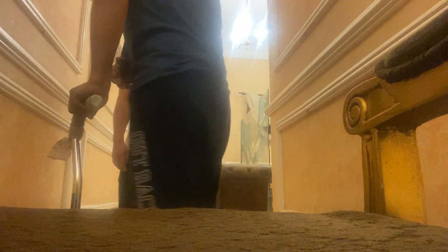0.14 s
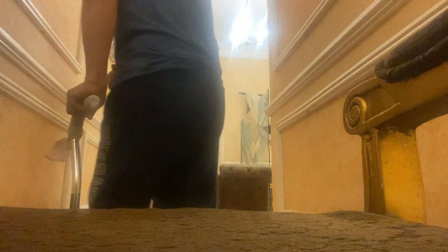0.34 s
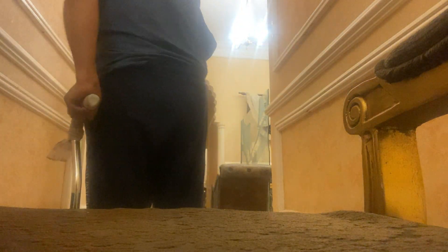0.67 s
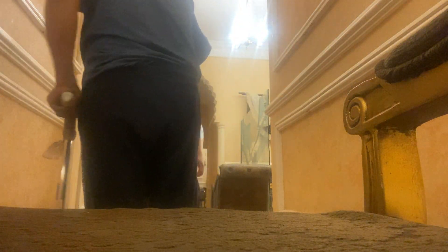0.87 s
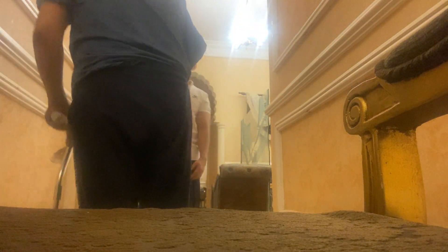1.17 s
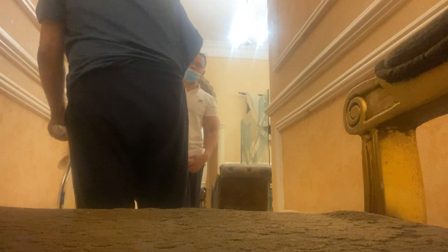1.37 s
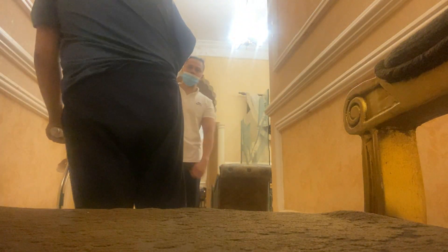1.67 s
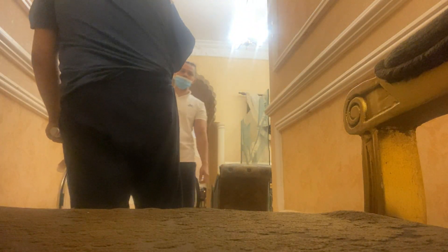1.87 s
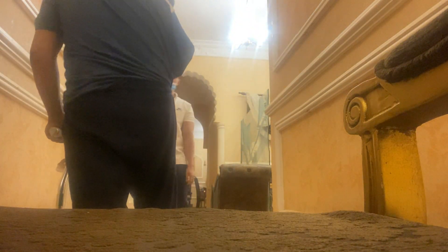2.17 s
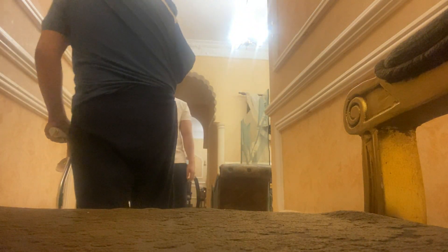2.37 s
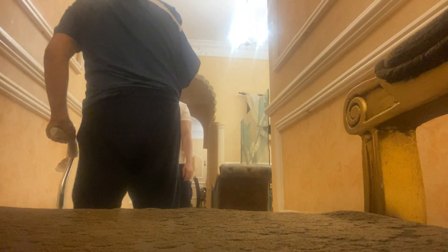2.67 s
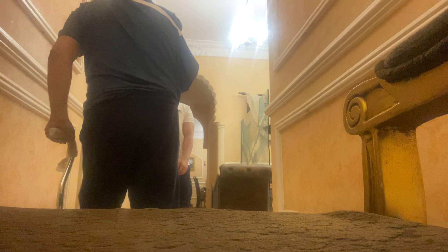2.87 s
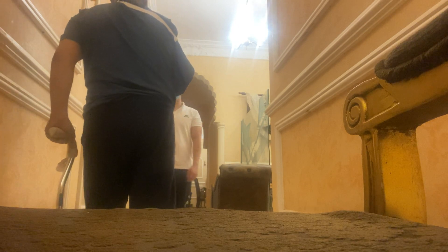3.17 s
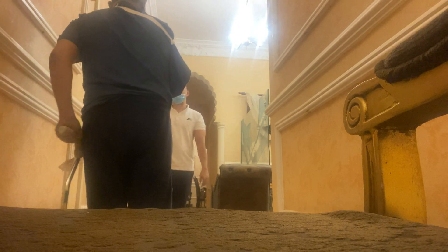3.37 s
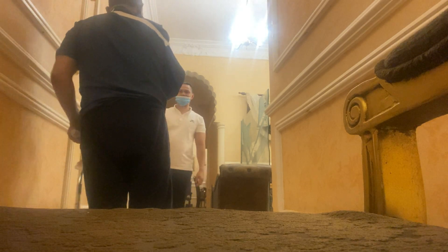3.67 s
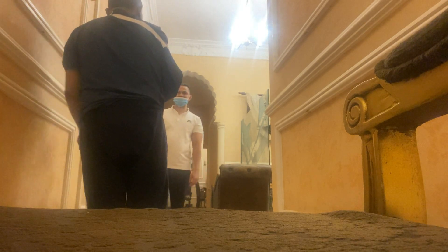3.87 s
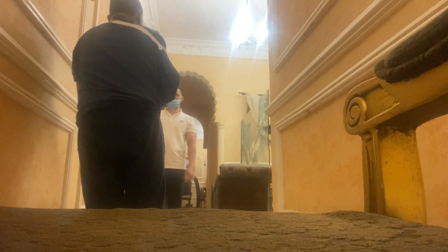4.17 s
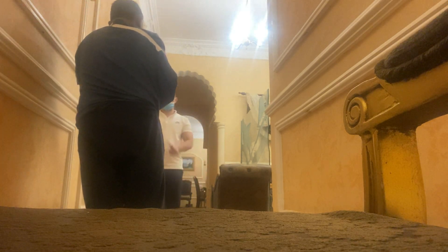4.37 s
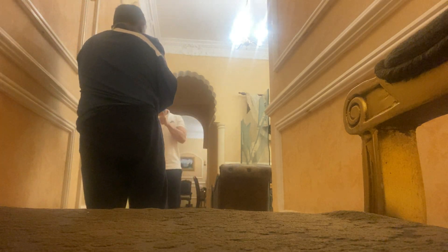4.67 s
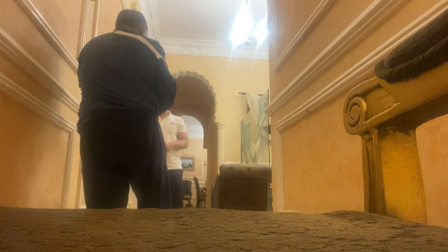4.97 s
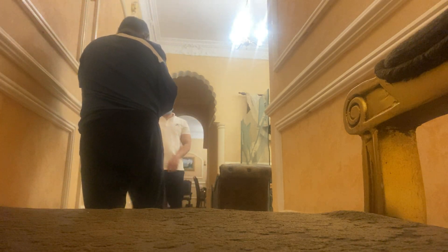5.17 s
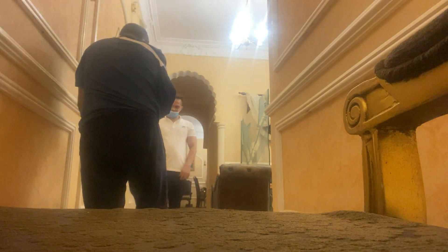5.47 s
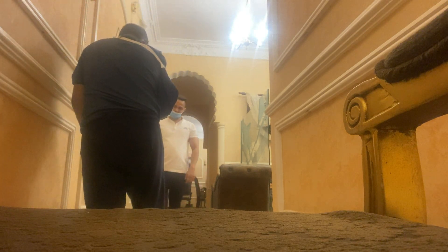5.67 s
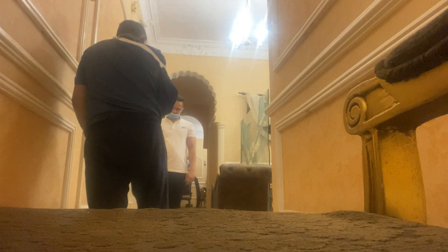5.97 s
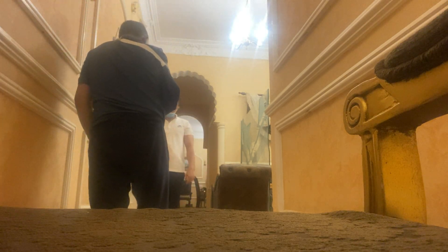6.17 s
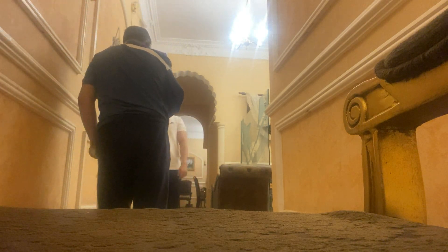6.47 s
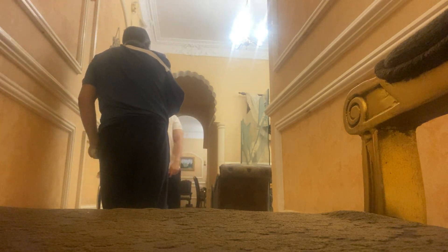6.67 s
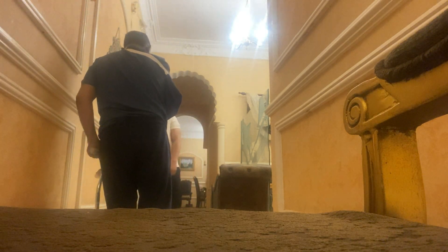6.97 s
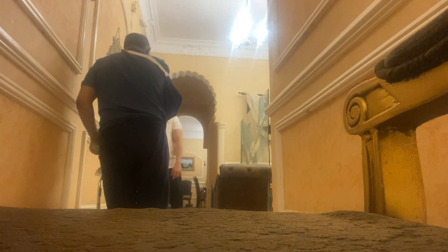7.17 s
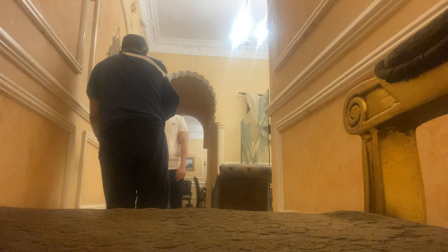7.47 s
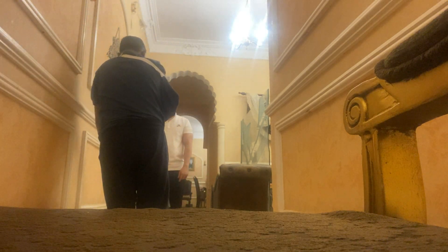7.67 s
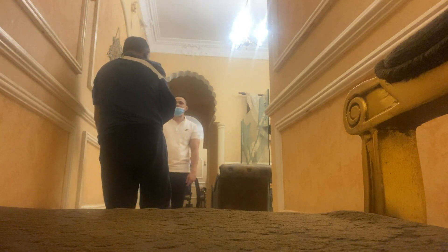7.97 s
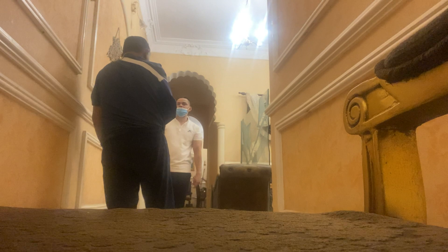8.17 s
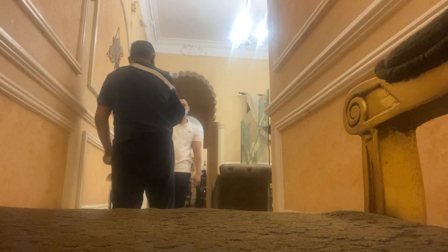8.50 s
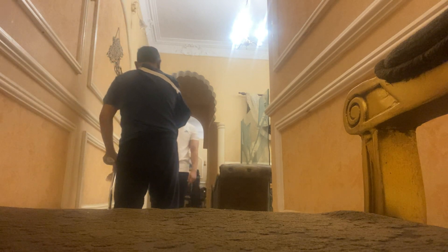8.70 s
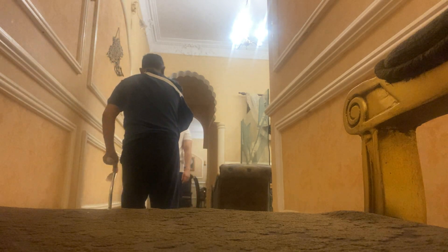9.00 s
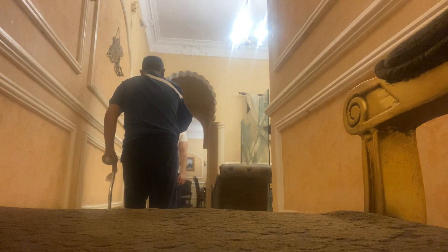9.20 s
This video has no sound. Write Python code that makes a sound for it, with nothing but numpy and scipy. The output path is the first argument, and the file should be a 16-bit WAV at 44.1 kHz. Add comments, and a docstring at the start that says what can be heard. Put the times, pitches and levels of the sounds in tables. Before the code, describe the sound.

A steady, bass-heavy ventilation hum with soft air noise fills a corridor, slowly swelling and sinking. Over it, sharp hollow cane taps start close and strong, then grow fainter as the walker moves off. Thin metallic chatter, gritty shoe slides, small ticks and faint cloth brushing fall between, with a duller footfall past the middle and a slight rubbery creak later. The stereo microphone stays still, near the floor.

```python
"""A metal cane taps slowly away down a hard-walled hallway in the hands of a walking man.
Its taps are coloured noise bursts with a ceiling echo; its loose tube rattles in short resonant bursts.
Soles slide, tick and creak and trousers swish as shaped noise; footfalls add damped sines and a thump.
Under it all the air conditioning drones: noise for air, sines for motors, and fans at nearly one speed
that beat in a slow, low throb. Table levels are relative, ahead of each layer's trim and the stereo stage."""
import sys
import numpy as np
from scipy import signal
from scipy.fft import rfft, irfft, next_fast_len
from scipy.io import wavfile
from scipy.ndimage import uniform_filter1d, map_coordinates

SR = 44100
rng = np.random.default_rng(int(sys.argv[2]) if len(sys.argv) > 2 else 0)


def wrap_up_sound(samples):
    """Save the sound to the file named by the first command line argument, as 16-bit audio."""
    columns = np.atleast_2d(samples).T
    # keep every value between -1 and 1, then stretch to whole-number steps
    tamed = np.clip(columns, -1, 1)
    steps = np.round(tamed * 32767).astype(np.int16)
    wavfile.write(sys.argv[1], SR, steps)


N = 411894


def amp(db):
    """Decibels to gain."""
    return 10 ** (np.asarray(db) / 20)


def unit(x):
    """Scaled to rms 1."""
    return x / np.sqrt(np.mean(x ** 2) + 1e-20)


def along(points, hz):
    """Read a curve of (frequency [Hz], value) points on a log frequency axis."""
    f, v = np.transpose(points)
    return np.interp(np.log(hz + 1), np.log(f + 1), v)


def clock(seconds=None):
    """Sample times of a stretch, or of the whole scene."""
    return np.arange(N if seconds is None else int(seconds * SR)) / SR


def wobble(rate):
    """A smooth random curve through `rate` knots a second."""
    knots = rng.standard_normal(int(N * rate / SR) + 4)
    return map_coordinates(knots, [clock() * rate])


def ripple(hz, spacing_hz):
    """A random comb of peaks and dips over frequency, rms 1."""
    knots = rng.standard_normal(int(SR / spacing_hz) + 4)
    return unit(map_coordinates(knots, [hz / spacing_hz]))


def swell(t, rise, fall):
    """A Gaussian hump that peaks at t = 0, with its own spread on each side."""
    return np.exp(-.5 * (t / np.where(t < 0, rise, fall)) ** 2)


def filtered(x, response):
    """Filter x by a response of frequency."""
    n = x.shape[-1]
    m = next_fast_len(n + 8192)
    spectrum = rfft(x, m) * response(np.fft.rfftfreq(m, 1 / SR))
    return irfft(spectrum, m)[..., :n]


# stereo width of the noises: (frequency [Hz], side minus mid [dB])
NOISE_WIDTH = [(60, -40), (110, -5.5), (200, -4.5), (370, -6.5), (690, 3.5), (1270, 3), (2340, -3.5),
               (4300, -1), (14000, -1)]


def noise(size, colour, width=NOISE_WIDTH):
    """Stereo noise of rms 1, from independent mid and side; colour gives dB for each frequency."""
    response = lambda hz: amp([colour(hz), colour(hz) + along(width, hz)])
    mid, side = filtered(rng.standard_normal((2, size)), response)
    return unit(np.array([mid + side, mid - side]))


def add(track, s, sound):
    """Mix a sound into the track from time s."""
    start = max(round(s * SR), 0)
    part = sound[..., :max(N - start, 0)]
    track[:, start:start + part.shape[-1]] += part


def lift(modes, hz):
    """The dB that (centre [Hz], width [Hz], lift [dB]) resonances add to a colour."""
    return sum(db / (1 + (2 * (hz - centre) / width) ** 2) for centre, width, db in modes)


def tilted(colour, bright_db, hinge_hz=6500):
    """A colour tilted by bright_db per octave up to the hinge, and shifted evenly above it."""
    return lambda hz: along(colour, hz) + bright_db * np.log2((np.minimum(hz, hinge_hz) + 100) / 4000)


def grains(size, per_s, life_s):
    """Envelope of rms 1: tiny contacts of random strength at random moments, each dying away."""
    strength = amp(np.minimum(3 * rng.exponential(size=size), 6))
    hits = (rng.random(size) < per_s / SR) * strength
    return unit(signal.lfilter([1], [1, -np.exp(-1 / (life_s * SR))], hits))


# ring of the hallway: (frequency [Hz], 60 dB decay time [s])
HALL_DECAY = [(300, 0.2), (2000, 0.48), (5000, 0.47), (8000, 0.37), (13000, 0.27)]


def hall_tail(build=0.0013):
    """A diffuse tail, independent in each channel, that builds up fast and decays by frequency."""
    hz, t, z = signal.stft(rng.standard_normal((2, SR * 3 // 4)), SR, nperseg=256)
    decay = amp(-60 * t / along(HALL_DECAY, hz)[:, None])
    tail = signal.istft(z * decay * (1 - np.exp(-t / build)), SR, nperseg=256)[1]
    return tail / np.linalg.norm(tail[0])


def burst(colour, attack, t60, side_db, wet_db):
    """A short crack of coloured noise with a smooth hall tail of the same colour."""
    tail = filtered(hall_tail(), lambda hz: unit(amp(colour(hz))))
    t = np.arange(tail.shape[1]) / SR
    shape = (1 - np.exp(-t / attack)) * amp(-60 * t / t60)
    crack = shape * noise(len(t), colour, [(1000, side_db)])
    crack *= np.sqrt(2) / np.linalg.norm(crack)
    # the level then follows the peak of the envelope
    return np.linalg.norm(shape) / shape.max() * (crack + amp(wet_db) * tail)


def in_hall(sound, wet_db):
    """A longer sound with a diffuse hall tail of its own."""
    wet = amp(wet_db) * signal.fftconvolve(sound, hall_tail(), axes=1)
    return wet + np.pad(sound, ((0, 0), (0, wet.shape[1] - sound.shape[1])))


# fans a little faster than the main one:
# (beat rate [per s], level under the main fan [dB], time in step with it [s])
FASTER_FANS = [(.2, -5.8, .34), (.76, -9, .35), (.95, -7.5, .64), (1.91, -12, .19)]


def throb():
    """Nearly equal fans slip in and out of step, so their common note swells and sinks."""
    t = clock()
    return 1 + sum(amp(db) * np.exp(2j * np.pi * beats * (t - s)) for beats, db, s in FASTER_FANS)


def patchy(x, depth_db, above_hz=700):
    """The upper bands of a noise swell and sink, neighbouring bands together."""
    hz, t, z = signal.stft(x, SR, nperseg=512)
    field = rng.standard_normal(z.shape[1:])
    field = uniform_filter1d(field, size=9, axis=0)  # across frequency
    field = unit(uniform_filter1d(field, size=22, axis=1))  # across time
    share = np.clip(hz / above_hz - 1, 0, 1)[:, None]
    return signal.istft(z * amp(depth_db * field * share), SR, nperseg=512)[1][:, :x.shape[1]]


# steady motor and mains tones: (frequency [Hz], level [dB], phase unsteadiness [rad])
MOTOR_TONES = [(68.7, -47.5, .3), (75.6, -48, .9), (78.5, -50.5, .4), (86.3, -50, .7), (116.2, -45.5, .5),
               (120, -50, .2), (157.6, -56, .8), (172, -57.5, .6), (180.3, -47.7, .25), (240, -56.5, .1)]
# spectrum of the moving air: (frequency [Hz], level per Hz [dB])
AIR_COLOUR = [(22, -25), (28, -16.5), (40, -24.5), (52, -4), (85, -3), (105, -12), (200, -15.5), (450, -21),
              (830, -33), (1000, -37), (1400, -42.5), (2650, -48), (3100, -54), (4500, -59.5), (5600, -68),
              (9000, -75.5), (15000, -78.5)]
# hallway resonances that the air excites: (centre [Hz], width [Hz], lift [dB])
HALLWAY_MODES = [(170, 8, 1.5), (285.1, 22, 7.5), (345, 26, 4.5), (417, 20, 8.5), (480.4, 22, 5.5),
                 (645.5, 11, 3), (695, 14, 3.5), (710, 13, -0.5), (766, 35, 6), (836, 18, 3)]


def air_conditioner(fan_hz=57.43, drone_db=-32.5, air_db=-38.0, drift=0.071, surge_db=0.95):
    """A throbbing fan note, steady motor tones and slightly surging air that rings the hallway."""
    t = clock()
    spin = 2 * np.pi * (fan_hz * t + rng.random()) + drift * wobble(1.9)  # drift in radians
    drone = amp(drone_db) * np.imag(throb() * np.exp(1j * spin))
    tones = sum(amp(db) * np.sin(2 * np.pi * hz * t + unsteady * wobble(3))
                for hz, db, unsteady in MOTOR_TONES)
    # higher up the room's modes crowd into a fine comb
    high_modes = lambda hz: 1.5 * ripple(hz, 16) * np.clip(hz / 300 - 1, 0, 1)
    colour = lambda hz: along(AIR_COLOUR, hz) + lift(HALLWAY_MODES, hz) + high_modes(hz)
    air = noise(N, colour) * amp(surge_db * wobble(12))
    air = patchy(air, depth_db=0.8)
    # both lean slightly to the right
    hum = np.sqrt(2) * (drone + tones) * amp([[-.15], [.15]])
    return hum + amp(air_db) * air * amp([[-.4], [.4]])


# swishes as one leg swings past the other: (time of peak [s], spread [s], level [dB])
LEG_SWISHES = [(0.148, 0.32, -83.5), (0.528, 0.051, -76.5), (0.762, 0.15, -80), (1.486, 0.03, -72.5),
               (1.83, 0.16, -83), (2.311, 0.059, -85.5), (2.722, 0.071, -88.5), (3.707, 0.03, -77.5),
               (3.91, 0.11, -84.5), (4.383, 0.013, -79.5), (4.702, 0.18, -82), (5.166, 0.055, -84),
               (6.622, 0.083, -84), (7.896, 0.15, -86.5), (8.113, 0.072, -84.5), (8.44, 0.045, -85),
               (8.6, 0.043, -89), (6.926, .03, -88)]
# spectrum of rubbing cloth: (frequency [Hz], level per Hz [dB])
FABRIC_COLOUR = [(800, -10), (2500, 3), (5500, 2), (8800, -1.5), (12000, -3), (14000, -3), (15000, -9)]


def trousers(cloth_db=8, rustle_db=-94, crinkle_db=-7, crinkles_per_s=60):
    """Cloth brushes on cloth in swells of noise over a faint rustle, its folds crinkling in tiny grains."""
    t = clock()
    swishes = sum((amp(db) * swell(t - s, spread, spread)) ** 2 for s, spread, db in LEG_SWISHES)
    power = amp(rustle_db) ** 2 + swishes
    flutter_db = 1.2 * wobble(30)
    colour = lambda hz: along(FABRIC_COLOUR, hz)
    crinkle = amp(crinkle_db) * grains(N, crinkles_per_s, .004) * noise(N, colour)
    return np.sqrt(power) * amp(cloth_db + flutter_db) * (noise(N, colour) + crinkle)


# rattles of the tube: (time [s], level [dB], ring level [dB], ring pitch [Hz])
TUBE_RATTLES = [(0.3164, -52.5, -20, 7500), (0.331, -55.5, -18, 7500), (0.9019, -57.5, 0, 7640),
                (1.365, -49.5, -9, 7660), (3.3195, -50, -3, 6500), (3.966, -57, -6, 7060),
                (4.088, -49, -5, 7650), (4.1155, -43.5, 0.5, 7350), (4.1205, -48, 0.5, 7500),
                (4.142, -48.5, 2, 7540), (4.354, -61, 0, 7300), (5.714, -62.5, 5.5, 7360),
                (5.942, -50, 1.5, 8020), (7.622, -47.5, -1, 7700), (7.661, -52, -0.5, 7500),
                (7.688, -55.5, -7, 7300), (7.76, -50, -3, 7600), (9.045, -63, 4.5, 8270)]
# resonances of the tube: (multiple of the ring pitch, width [Hz], level [dB])
TUBE_MODES = [(1, 560, 4), (1.13, 1000, -3.5), (.6, 450, -1.5), (1.7, 3000, -19.5)]
# spectrum of a hard tap, shared by rattles, shoe ticks and cane taps: (frequency [Hz], level per Hz [dB])
HARD_TAP_COLOUR = [(500, -14.5), (1100, 0.5), (2500, 0.5), (4200, 1.5), (6000, -2), (8500, -7.5),
                   (11000, -11.5), (14500, -18.5)]


def cane_rattles(tick_db=-8, tube_db=-7, chatter_t60=0.033, wet_db=-0.5):
    """Play in the telescopic joint: a tick with a brief noise burst at the tube's resonances."""
    out = np.zeros((2, N))
    for s, db, ring_db, ring_hz in TUBE_RATTLES:
        tube = lambda hz: 10 * np.log10(sum(
            amp(level) ** 2 / (1 + (2 * (hz - k * ring_hz) / width) ** 2) ** 2
            for k, width, level in TUBE_MODES))
        tick = burst(tilted(HARD_TAP_COLOUR, 0), attack=.0015, t60=.04, side_db=-2, wet_db=wet_db)
        ring = burst(tube, attack=.001, t60=chatter_t60, side_db=-3.5, wet_db=wet_db)
        add(out, s, amp(db) * (amp(tick_db) * tick + amp(tube_db + ring_db) * ring))
    return out


# soles sliding on the floor:
# (time of peak [s], rise [s], level [dB], brightness [dB per octave], sole ring [Hz])
SOLE_SLIDES = [(.41, 0.041, -49.5, -3, 2850), (.6, .23, -68.5, 0.5, 2700), (.872, .014, -59, 0, 2000),
               (1.385, 0.015, -59.5, -4.5, 1650), (1.484, 0.016, -50, -1, 1550),
               (1.565, .03, -56.5, -2.5, 2200), (2.56, 0.039, -56.5, -7, 1910),
               (3.19, 0.074, -60, -6, 1700), (3.315, 0.039, -56, -5, 2000), (3.545, .039, -57.5, -7, 1700),
               (3.745, 0.029, -55.5, -2, 2220), (4.126, 0.022, -50.5, 0.5, 2960),
               (4.18, .03, -59, -1.5, 2000), (4.352, 0.0077, -53.5, -5, 1500),
               (4.77, 0.14, -71.5, 4.5, 4400), (5.53, .08, -64, -4, 1900), (5.72, 0.054, -62.5, -4.5, 2400),
               (5.957, 0.006, -54, 4.5, 6400), (6.005, 0.038, -51.5, -1.7, 2200),
               (6.06, .02, -56.5, -1, 2250), (7.05, 0.075, -64, -4, 1400), (7.627, 0.0057, -54, -1, 1450),
               (7.675, .02, -60, -2, 2100)]
# spectrum of a sliding sole: (frequency [Hz], level per Hz [dB])
SLIDE_COLOUR = [(400, -11), (1100, -1.5), (1700, -0.5), (2500, 1), (3300, -5), (4600, -9.5), (6000, -12.5),
                (9000, -14.5), (14500, -26.5)]


def shuffles(slide_db=-3, comb_db=2.0, grit_db=-5.5, grains_per_s=220, lift_s=0.025, lift_share=0.13):
    """A sole rubs unevenly over ticking grit, ringing at its own pitch; near walls comb the hiss."""
    out = np.zeros((2, N))
    for s, rise, db, bright_db, sole_hz in SOLE_SLIDES:
        t = clock(.8) - .3
        # the slide dies away as the sole lifts, more slowly after a slow rise
        stroke = swell(t, rise, np.hypot(lift_s, lift_share * rise))
        ring = [(sole_hz, .3 * sole_hz, 4)]
        tilt = lambda hz: bright_db * np.log2((hz + 100) / 2500)
        colour = lambda hz: along(SLIDE_COLOUR, hz) + tilt(hz) + lift(ring, hz) + comb_db * ripple(hz, 90)
        unevenness = unit(uniform_filter1d(rng.standard_normal(len(t)), size=170))
        grip = unit(amp(3.2 * unevenness))
        grit = grains(len(t), grains_per_s, .001) * noise(len(t), colour)
        rub = grip * noise(len(t), colour) + amp(grit_db) * grit
        add(out, s + t[0], in_hall(amp(db + slide_db) * stroke * rub, wet_db=0.5))
    return out


# ticks of a shoe as the weight shifts onto it: (time [s], level [dB], brightness [dB per octave])
WEIGHT_TICKS = [(.553, -58, -2), (.624, -59.5, 0), (.724, -58, 1), (.818, -56.5, -4.5), (.873, -55, 0.5),
                (4.349, -51, -5.5)]


def shoe_ticks(tick_db=-5, wet_db=-2):
    """A shoe under shifting weight gives a small, short noise tick."""
    out = np.zeros((2, N))
    for s, db, bright_db in WEIGHT_TICKS:
        colour = tilted(HARD_TAP_COLOUR, bright_db)
        tick = burst(colour, attack=.001, t60=.025, side_db=-2, wet_db=wet_db)
        add(out, s, amp(db + tick_db) * tick)
    return out


# body resonances of the cane, lent to every tap and the heel scrape: (centre [Hz], width [Hz], lift [dB])
CANE_BODY = [(1400, 300, -1.5), (1950, 200, 0), (2540, 350, 1), (4500, 400, 0.5), (6200, 600, 2.2),
             (8200, 400, 2.5)]


def tap_colour(colour, bright_db, note_hz, note_db=3, comb_db=2.0):
    """A tap's colour, with its hollow note, the cane's resonances and the comb of nearby walls."""
    modes = list(CANE_BODY) + [(note_hz, .13 * note_hz, note_db)]
    return lambda hz: tilted(colour, bright_db)(hz) + lift(modes, hz) + comb_db * ripple(hz, 120)


# cane taps, and at 5.94 s a heel scrape played the same way with a faint ceiling echo: (time [s], level [dB],
# ceiling echo relative to an untrimmed tap [dB], brightness [dB per octave], tink level [dB], hollow note [Hz])
TAPS_AND_SCRAPE = [(1.1922, -36.5, 0.5, -4.5, -57, 2550), (1.9822, -38.5, 0, 0.2, -74.5, 3500),
                   (3.2844, -43, 5.5, -5, -59.5, 2270), (4.5455, -47, 2.5, 1, -69, 4400),
                   (5.4585, -49, 2, -4, -64.5, 2580), (5.9402, -47, -7.5, 2, -56.5, 4700),
                   (7.6226, -52.5, 2, -5, -72.5, 1500), (9.2519, -49, 2.5, 0.5, -82, 2700)]
# spectrum of the ceiling echo: (frequency [Hz], level per Hz [dB])
CEILING_COLOUR = [(600, -4), (1400, 1.5), (2500, 6), (4000, -2), (8000, -5.5), (11000, -22.5), (14500, -30)]
# the ceiling echo closes in as he walks away: first delay [s], shortening [s per s]
CEILING_S, CEILING_CLOSES_S_PER_S = .0101, .00023


def taps_and_scrape(tap_db=-3, echo_db=0, wet_db=0, echo_wet_db=-5, tink_hz=13000, tink_t60=0.033):
    """The tip clacks on the floor with a thin metal tink; a duller copy soon comes off the ceiling. One heel
    scrape is played the same way, with only a faint ceiling echo."""
    out = np.zeros((2, N))
    tink_points = [(tink_hz * .6, -25), (tink_hz * .85, -2), (tink_hz, 0), (tink_hz * 1.2, -5)]
    tink_colour = lambda hz: along(tink_points, hz)
    for s, db, ceiling_db, bright_db, tink_db, note_hz in TAPS_AND_SCRAPE:
        clack_colour = tap_colour(HARD_TAP_COLOUR, bright_db, note_hz)
        clack = burst(clack_colour, attack=.003, t60=.02, side_db=-4, wet_db=wet_db)
        echo_colour = tap_colour(CEILING_COLOUR, bright_db, note_hz)
        echo = burst(echo_colour, attack=.0015, t60=.016, side_db=-2, wet_db=echo_wet_db)
        tink = burst(tink_colour, attack=.001, t60=tink_t60, side_db=2, wet_db=wet_db)
        add(out, s, amp(db + tap_db) * clack + amp(tink_db) * tink)
        echo_s = s + CEILING_S - CEILING_CLOSES_S_PER_S * s
        add(out, echo_s, amp(db + ceiling_db + echo_db) * echo)
    return out * amp([[-.8], [.8]])  # slightly right of centre


# dull footfalls: (time [s], level [dB], knock pitch [Hz])
DULL_STEPS = [(2.205, -51, 350), (4.352, -44, 290), (5.688, -36, 418)]
# the floor's knock: (multiple of the knock pitch, level [dB], 60 dB decay time [s])
FLOOR_KNOCK = [(1, -1, .1), (1.24, 1, .08)]


def footfalls(attack=0.02, thump_db=-3, thump_t60=.13):
    """The weight comes down softly: the floor gives a hollow two-note knock and a low thump."""
    out, t = np.zeros((2, N)), clock(.3)
    push = lambda t60: (1 - np.exp(-t / attack)) ** 3 * amp(-60 * t / t60)
    rise_and_fall = lambda t60: push(t60) / push(t60).max()
    thump_colour = lambda hz: -3 * (np.log2((hz + 1) / 140) / .55) ** 2  # a hump around 140 Hz
    for s, db, knock_hz in DULL_STEPS:
        knock = sum(amp(level) * rise_and_fall(t60) * np.sin(2 * np.pi * (k * knock_hz * t + rng.random()))
                    for k, level, t60 in FLOOR_KNOCK)
        thump = rise_and_fall(thump_t60) * noise(len(t), thump_colour)
        add(out, s, in_hall(amp(db) * (knock + amp(thump_db) * thump), wet_db=-15))
    return out


# the creak of a sole turning on the floor: (time of peak [s], spread [s], nominal pitch [Hz])
SOLE_CREAK = (7.085, .07, 1390)


def sole_creak(creak_db=-59, width_hz=115, overtone_db=-13):
    """Rubber sticks and slips: a faint, narrow band of noise with a weaker overtone."""
    s, spread, pitch_hz = SOLE_CREAK
    band = lambda hz, k: 1 / (1 + (2 * (hz / k - pitch_hz) / width_hz) ** 2)
    colour = lambda hz: 20 * np.log10(band(hz, 0.97) + amp(overtone_db) * band(hz, 2.15))
    return amp(creak_db) * swell(clock() - s, spread, spread) * noise(N, colour)


def scene():
    """The walker and the drone of the hallway."""
    walker = cane_rattles() + shuffles() + shoe_ticks() + taps_and_scrape() + footfalls() + sole_creak()
    return air_conditioner() + trousers() + walker


# treble that is wide in some bands and narrow in others: (frequency [Hz], side minus mid [dB])
STEREO_TREBLE = [(6000, 1.5), (7500, -5.5), (9300, -3), (10100, 18), (10900, 18), (11700, -5),
                 (13000, -4.5), (15000, 0.5)]


def record(dry, top_hz=15000):
    """The stereo picture is uneven in the treble, and nothing is kept from the band limit up."""
    turn = lambda hz: np.arctan(amp(along(STEREO_TREBLE, hz)))
    pair = np.array([dry[0] + dry[1], dry[0] - dry[1]]) / np.sqrt(2)
    balance = lambda hz: (hz < top_hz) * np.array([np.cos(turn(hz)), np.sin(turn(hz))])
    mid, side = filtered(pair, balance)
    return np.array([mid + side, mid - side])


dry = scene()
out = record(dry)
wrap_up_sound(out)
```